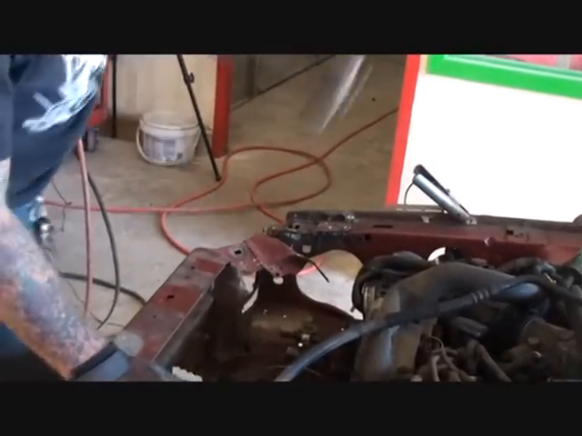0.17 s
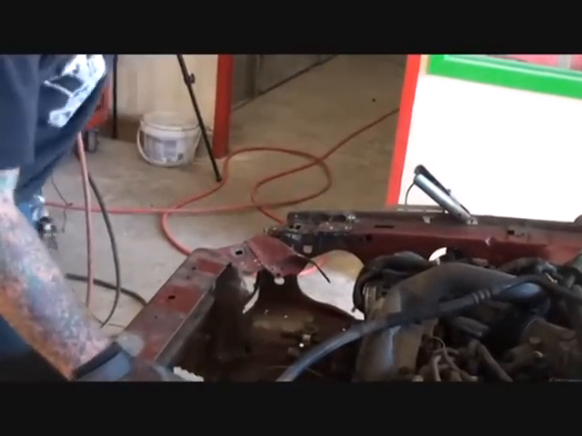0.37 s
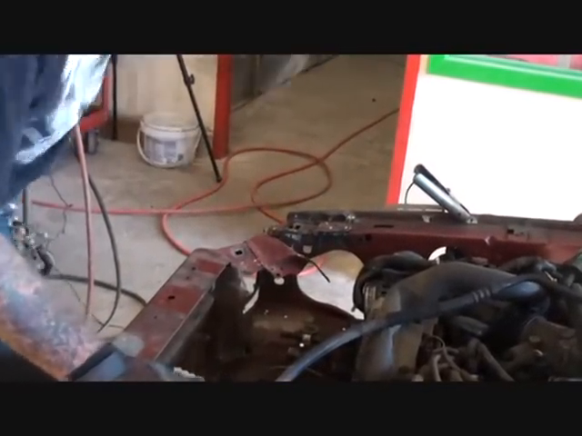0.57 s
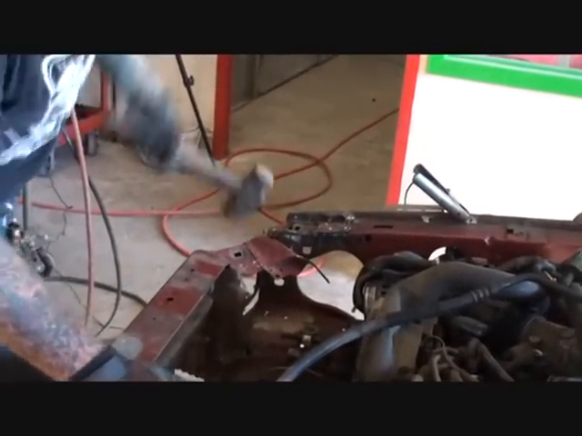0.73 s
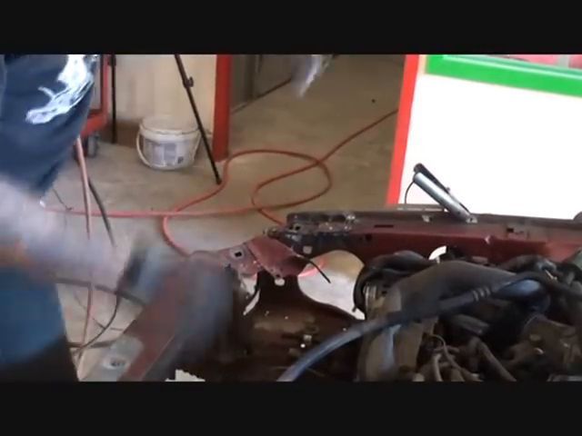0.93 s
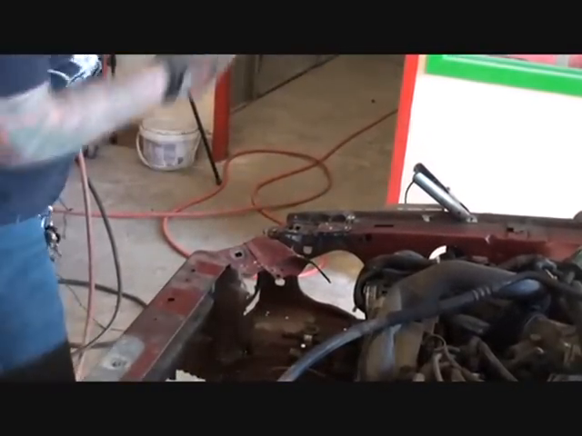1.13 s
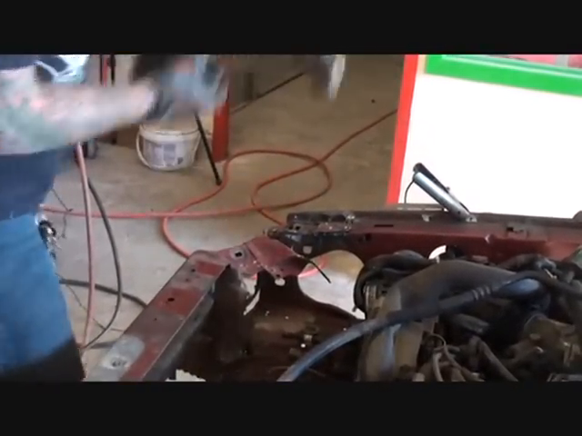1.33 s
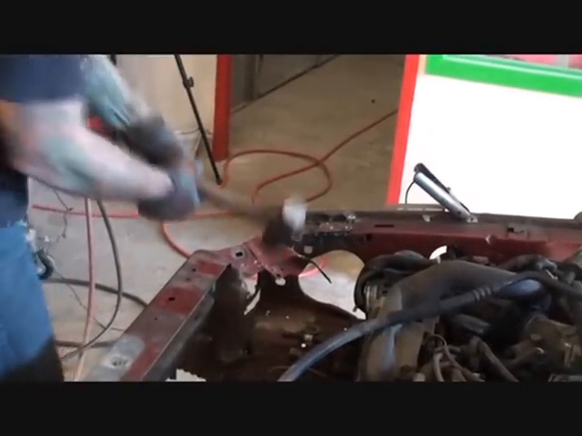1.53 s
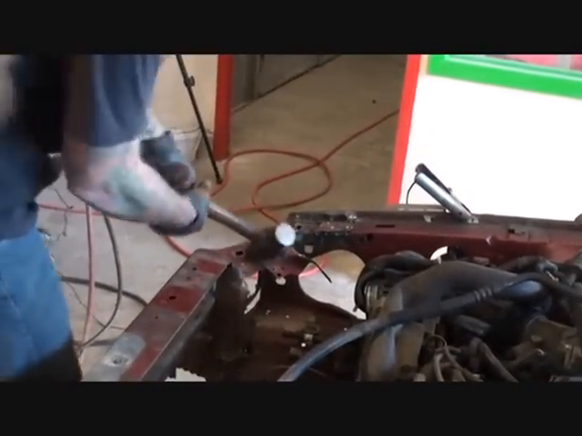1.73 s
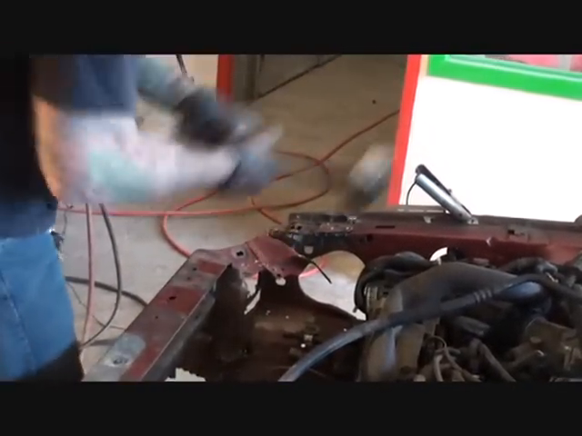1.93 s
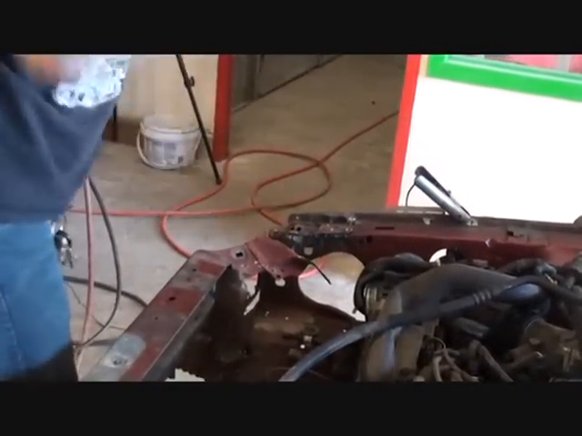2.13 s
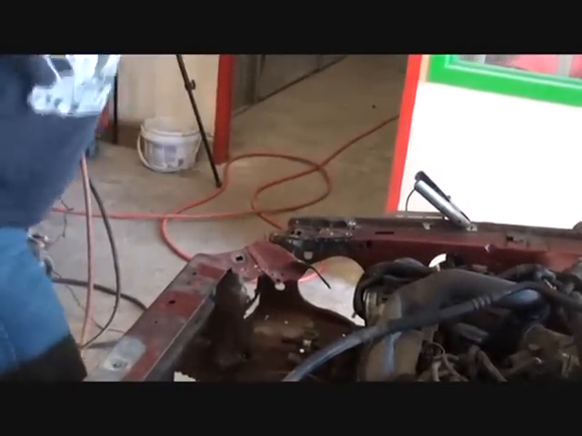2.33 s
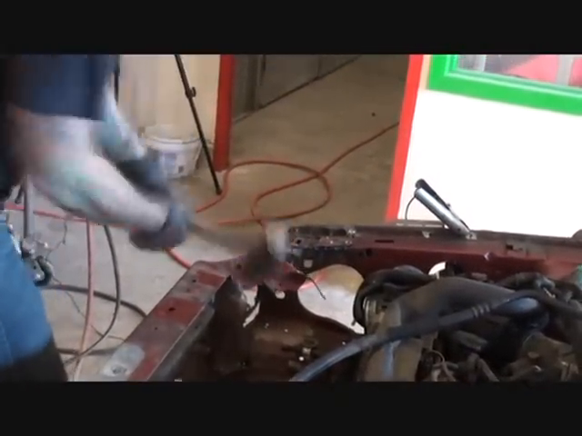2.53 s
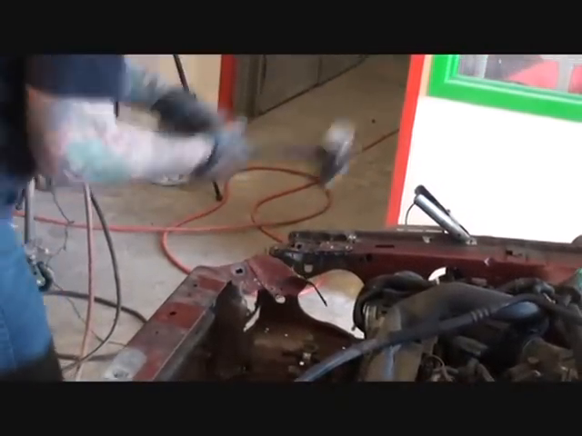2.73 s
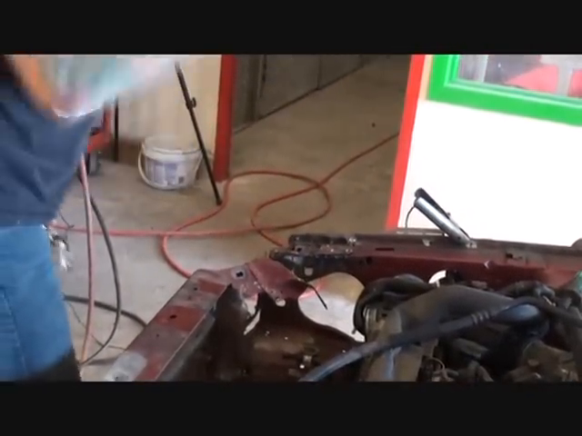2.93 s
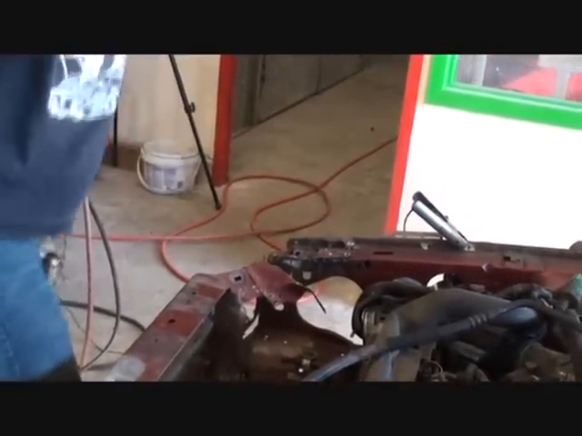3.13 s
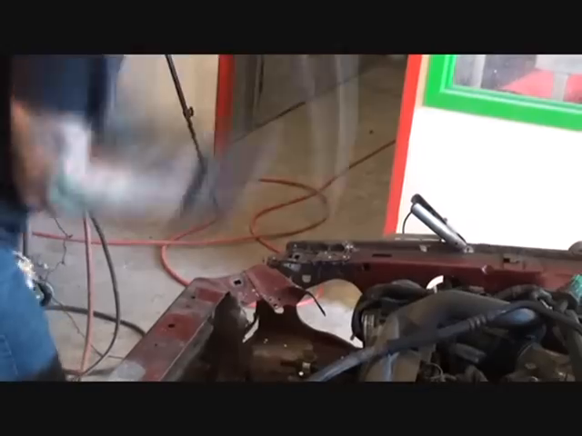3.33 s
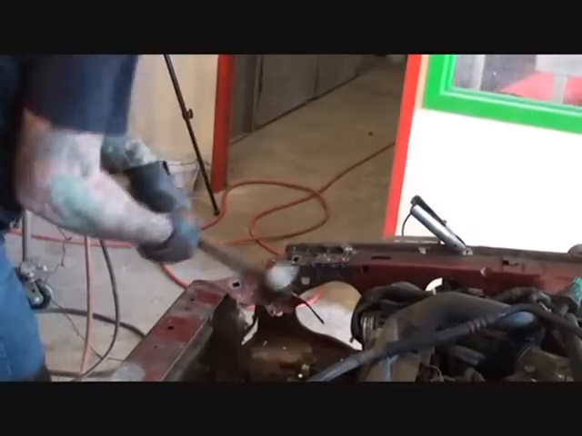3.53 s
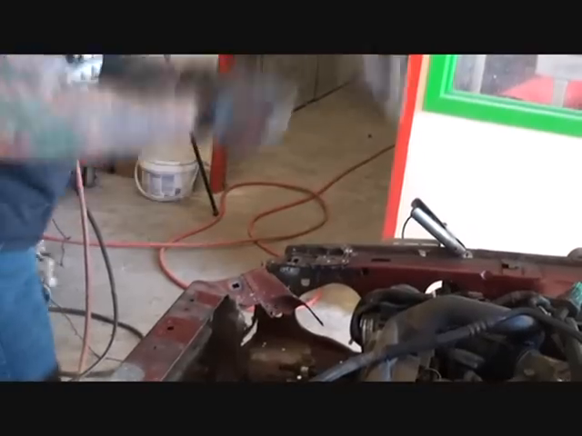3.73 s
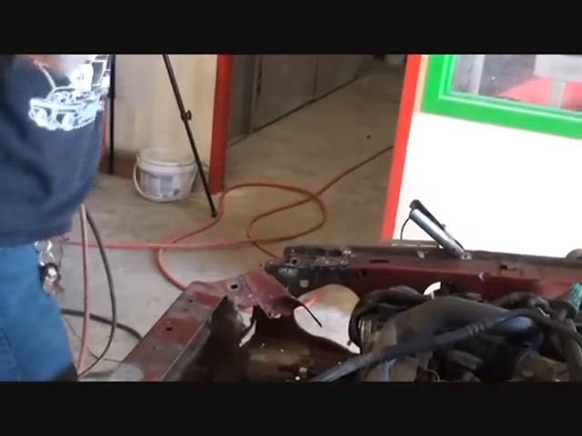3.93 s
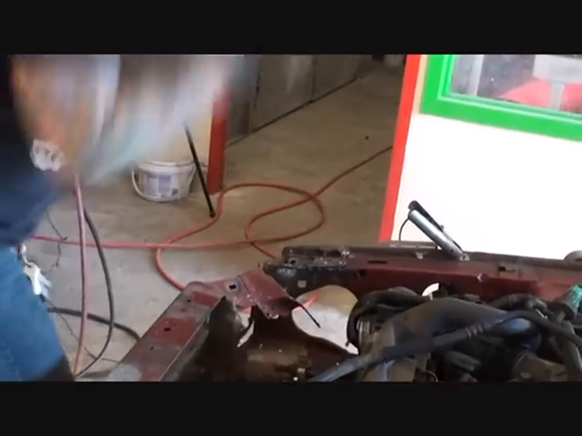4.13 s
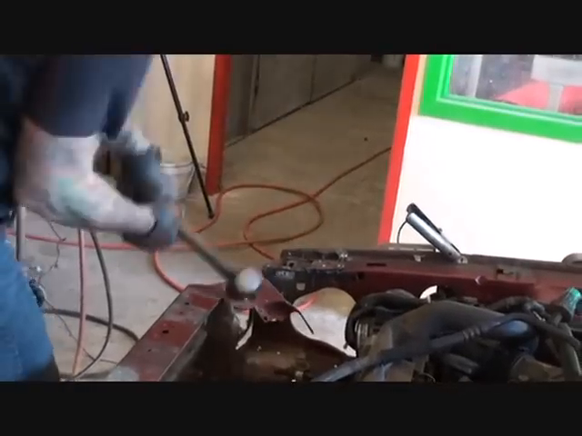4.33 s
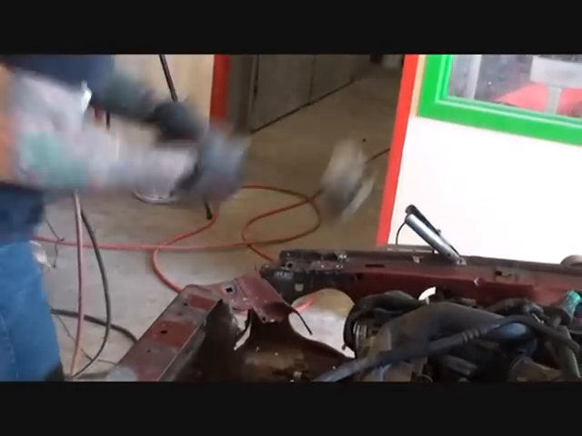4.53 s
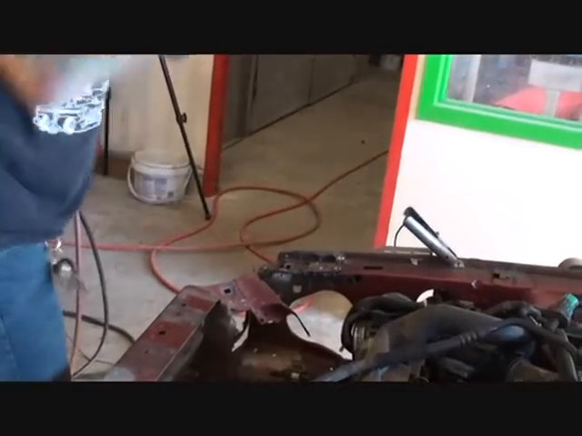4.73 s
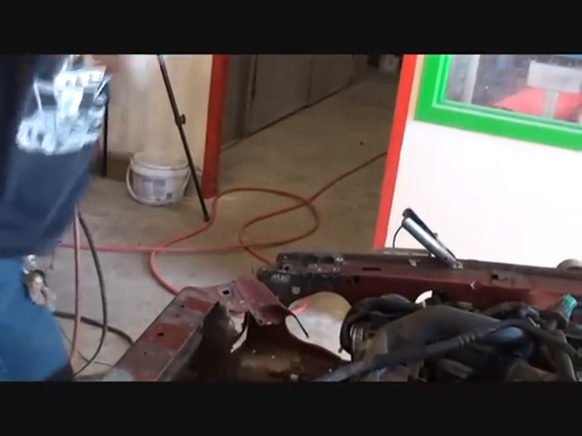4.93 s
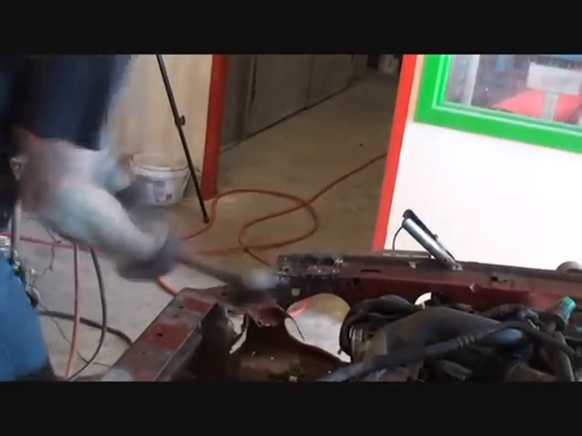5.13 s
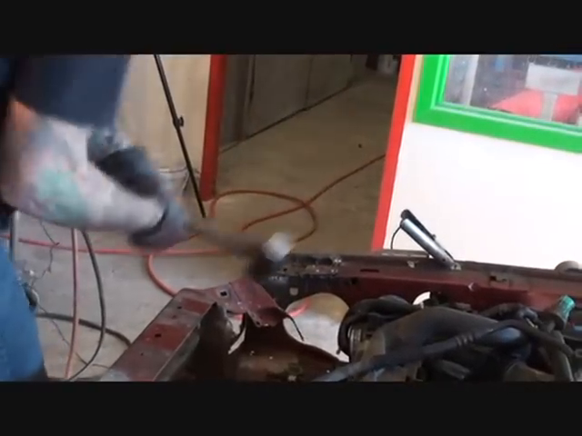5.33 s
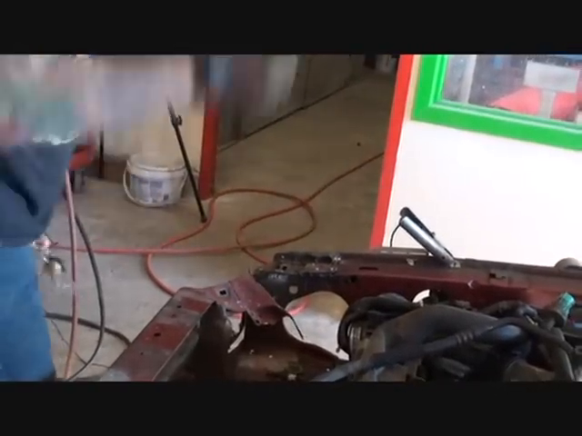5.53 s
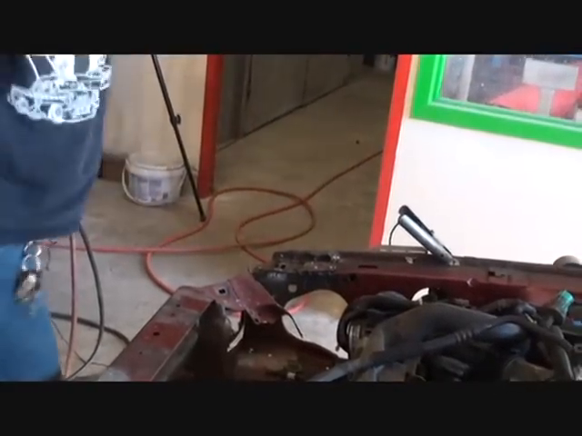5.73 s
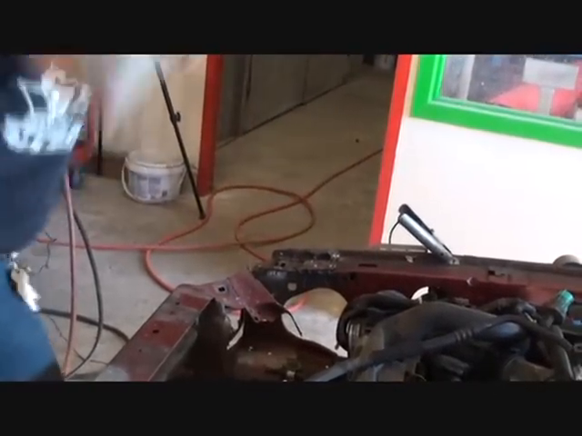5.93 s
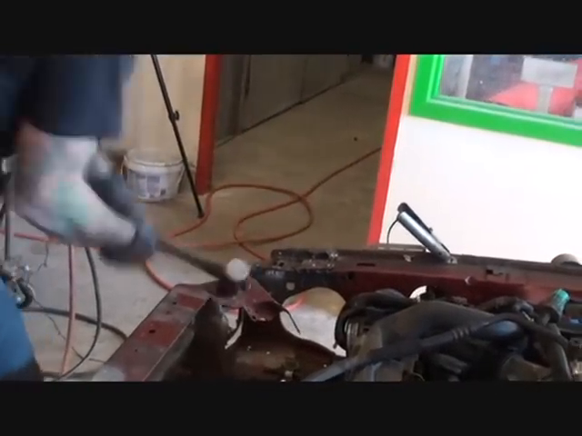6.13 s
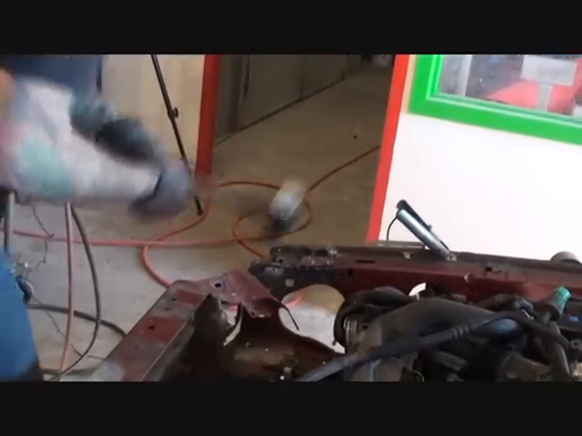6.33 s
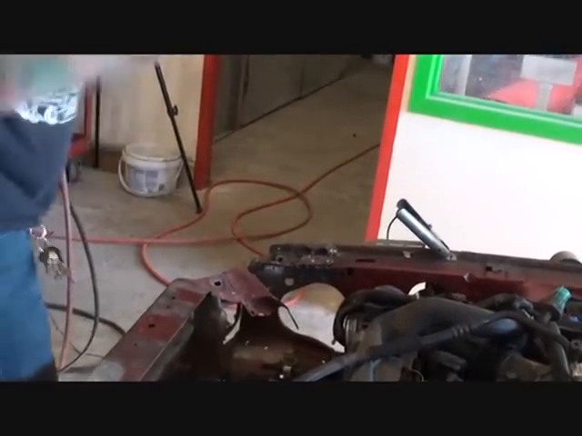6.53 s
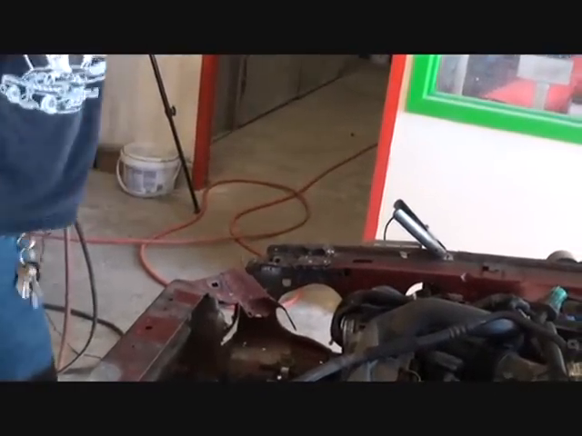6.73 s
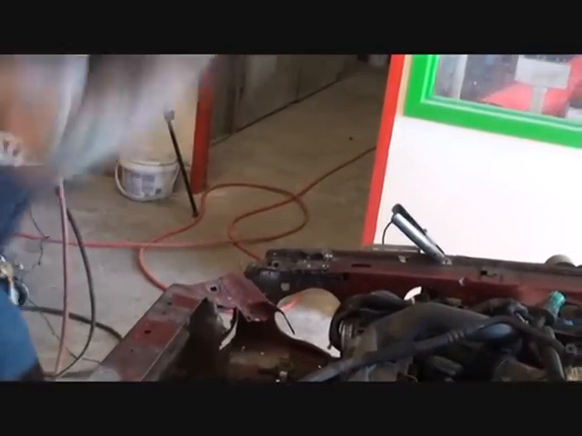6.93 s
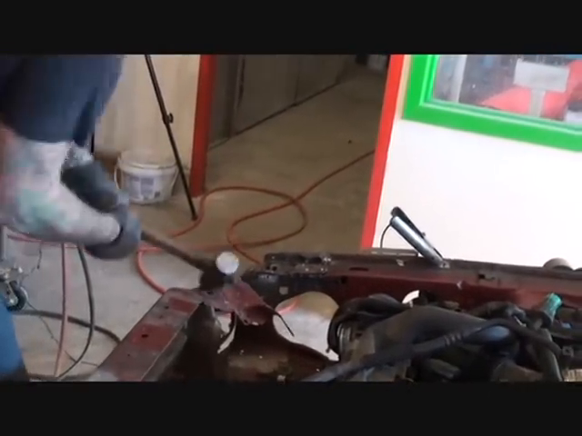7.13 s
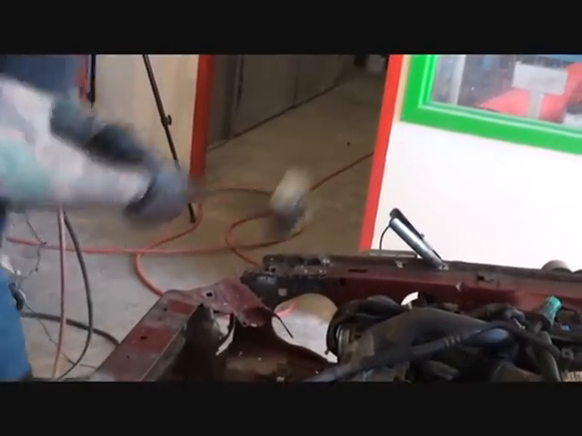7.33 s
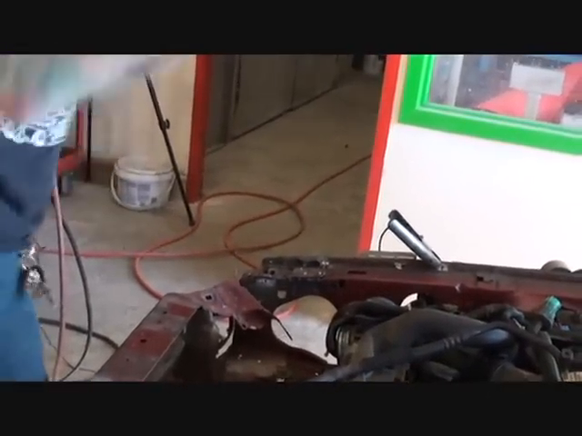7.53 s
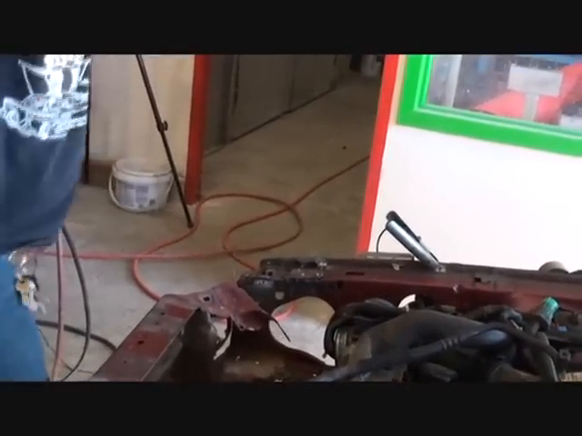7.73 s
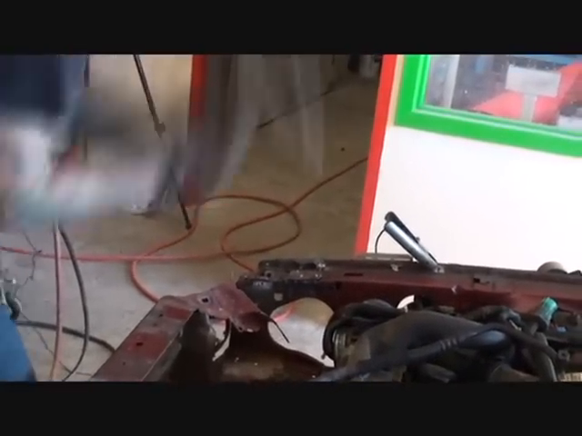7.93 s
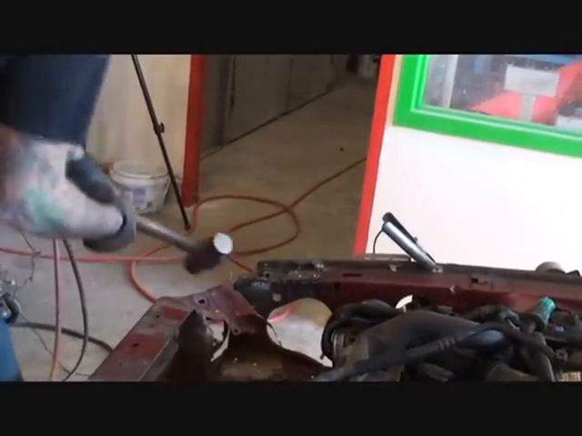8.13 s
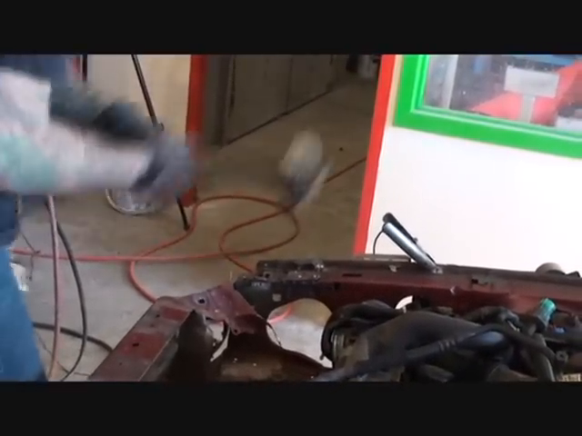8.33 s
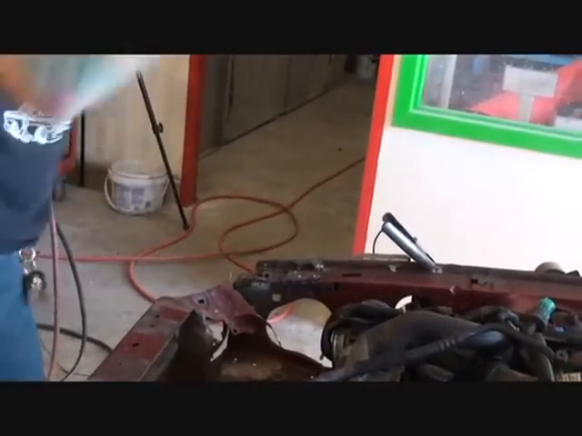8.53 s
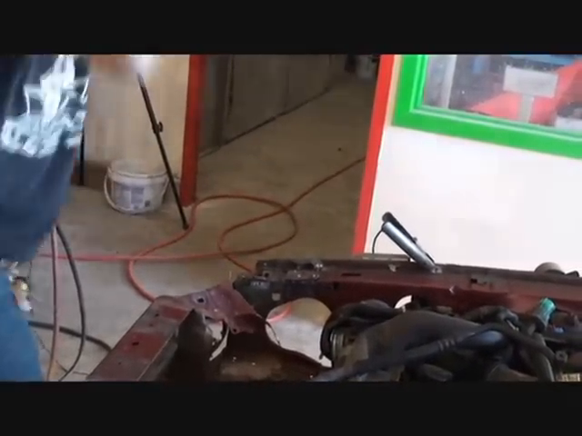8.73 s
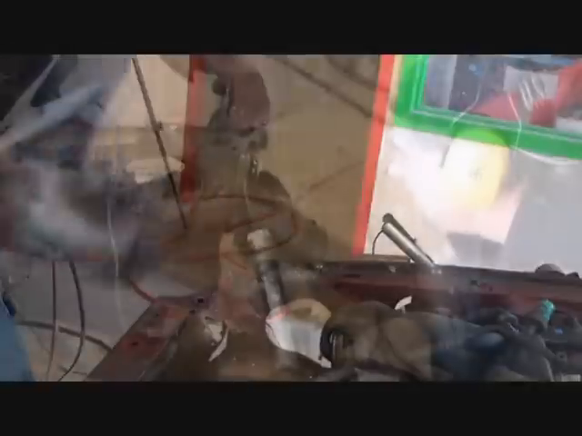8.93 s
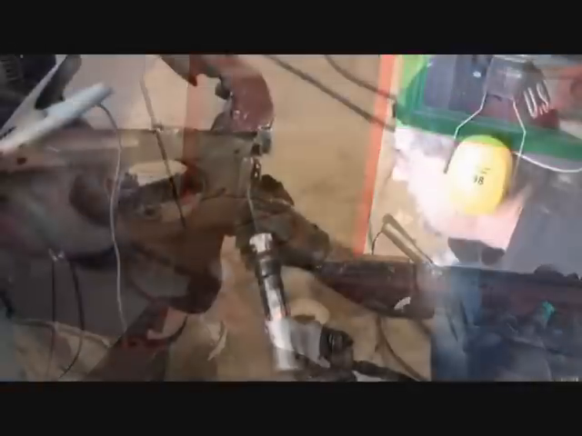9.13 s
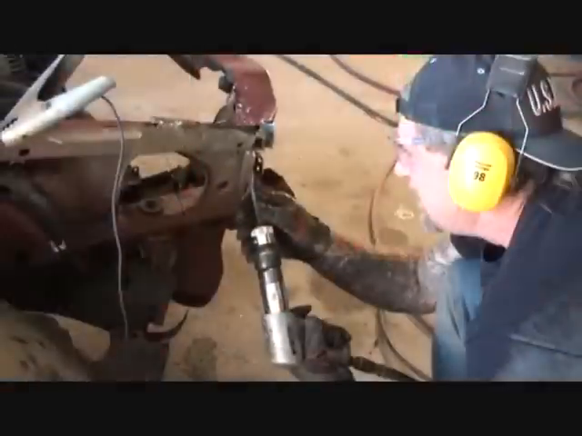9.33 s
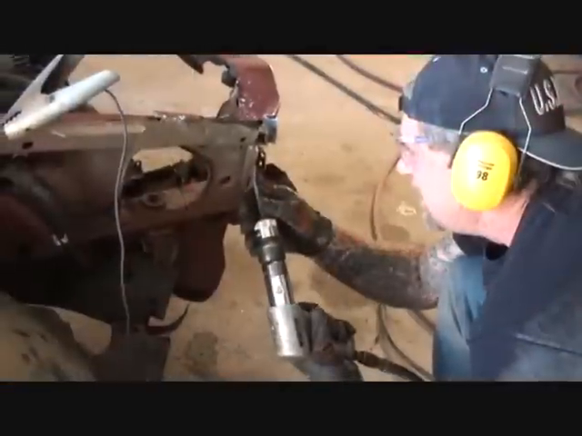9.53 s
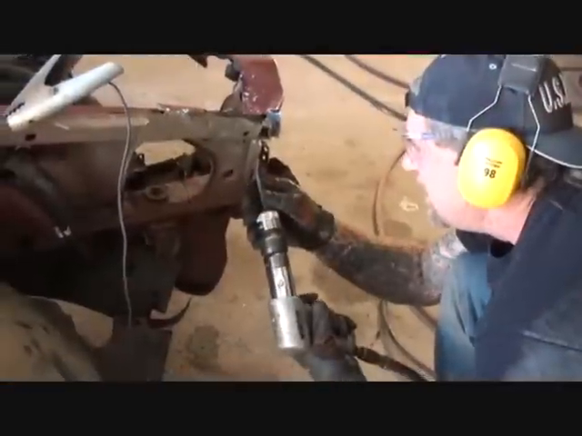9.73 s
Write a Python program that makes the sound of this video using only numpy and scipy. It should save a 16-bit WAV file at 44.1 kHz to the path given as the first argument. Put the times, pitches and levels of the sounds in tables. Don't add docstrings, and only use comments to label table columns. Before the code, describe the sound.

A reverberant workshop, heard through one overloaded camera microphone whose limiter squashes each hit. Steady air leaks hiss over a faint, wavering compressor hum. A sledgehammer hits a car's steel front frame at once, then at 0.8 seconds, just after a thin hose whistle swoops up and down. At 1.8 a glancing blow rings duller, with clearer mid-pitched tones. Full clangs follow at 2.7, 3.5, 4.4, 5.3, 6.2, 7.2 and 8.1, dense and noisy, fading within a second; the one at 7.2 is hardest, with a deep thump. Loose parts clink brightly at 3.1, tap dully around 4.8 and clink loudly at 6.55. A lower, faint whistle precedes the 5.3 blow. From 8.8 the scene crossfades: a last blow at 9.1 mixes with an air chisel's rapid rattles, about 35 to 40 strokes a second, in short bursts, a longer one at 9.5, then isolated taps, the strongest near 9.9.

```python
import sys
import numpy as np
from scipy import signal
from scipy.fft import rfft, irfft, next_fast_len
from scipy.io import wavfile
from scipy.ndimage import uniform_filter1d

SR = 44100
rng = np.random.default_rng(int(sys.argv[2]) if len(sys.argv) > 2 else 0)


def to_wav(sig):
    pcm = np.clip(np.atleast_2d(sig), -1, 1) * 32767
    pcm = np.round(pcm).astype(np.int16)
    wavfile.write(sys.argv[1], SR, pcm.T)


def ratio(d):
    e = np.asarray(d, float) / 20
    return 10 ** e


N = 436147

# (frequency [Hz], level [dB per Hz])
FRAME_COLOUR = [(24, -63), (40, -44.5), (185, -18.5), (542, -2.5), (1020, 1), (2210, -4.5), (2700, -3.5),
                (3740, -7), (5440, -8), (6170, -12.5), (6820, -12.5), (8550, -16.5), (13800, -35.5),
                (16000, -42)]
# (frequency [Hz], width [Hz], level [dB])
FRAME_PANELS = [(297, 8.5, 4.5), (577, 30, 4), (907, 51, 1.5), (1110, 23, 0.5), (1250, 20, 1.5),
                (2700, 170, 2), (3060, 310, 2.5), (6840, 150, 3)]


def evened(x):
    return x / np.sqrt(np.mean(x ** 2) + 1e-20)


def read(points, hz):
    f, value = np.transpose(points)
    return np.interp(np.log(hz + 1), np.log(f + 1), value)


def add(mix, s, sound):
    part = mix[round(s * SR):][:len(sound)]
    part += sound[:len(part)]


def coloured(x, colour, peaks, bright_db=0.):
    hz = np.fft.rfftfreq(len(x), 1 / SR)
    bumps_db = sum(db / (1 + (2 * (hz - f) / width) ** 2) for f, width, db in peaks)
    tilt_db = bright_db * np.log2(hz / 2000 + 0.094)
    shape = ratio(read(colour, hz) + bumps_db + tilt_db)
    return irfft(rfft(x) * evened(shape), len(x))


def fuzzy(hz, width):
    keep = np.exp(-np.pi * width / SR)
    noise = rng.standard_normal((2, len(hz)))
    for _ in range(2):
        noise = signal.lfilter([1], [1, -keep], noise)
    a, b = noise
    carrier = np.exp(2j * np.pi * np.cumsum(hz) / SR)
    return evened(((a + 1j * b) * carrier).real)


def leak_hiss():
    # (frequency [Hz], level [dB per Hz])
    leak_colour = [(35, -41), (60, -26), (150, -23), (380, -17), (700, -11.5), (1400, -16.5), (2600, -13),
                   (4000, -17), (6500, -17.5), (8000, -19), (10000, -15.5), (11500, -22.5), (13000, -29.5),
                   (16000, -35)]
    # (frequency [Hz], width [Hz], level [dB])
    leak_pipes = [(2580, 210, 0), (4300, 260, 4), (7040, 310, 2.5), (9300, 370, 0), (10200, 760, -0.5),
                  (14900, 900, 8)]
    # (time [s], level [dB])
    leak_drift = [
        (0, 2),
        (1.7, .2),
        (2.2, 1.7),
        (5.1, 2),
        (6, 0.5),
        (8.7, -0.1),
    ]
    t = np.arange(N) / SR
    flutter = evened(uniform_filter1d(uniform_filter1d(rng.standard_normal(N), 3000), 3000))
    hiss_drift_db = np.interp(t, *np.transpose(leak_drift))
    hiss = coloured(rng.standard_normal(next_fast_len(N, True)), leak_colour, leak_pipes)[:N]
    return ratio(-41 + hiss_drift_db + .5 * flutter) * hiss


def compressor_hum():
    # (frequency [Hz], level [dB rms])
    hum_tones = [(484.5, -54), (820, -64), (1130, -55), (1293, -66), (1454, -61), (2588, -63),
                 (2722, -59.5), (4528, -61)]
    drift_db = -.5 * (np.arange(N) / SR - 3.5)
    out = np.zeros(N)
    for hz, db in hum_tones:
        waver = evened(uniform_filter1d(rng.standard_normal(N), 9000))
        phase = 2 * np.pi * np.cumsum(hz * (1 + .001 * waver)) / SR
        out += np.sqrt(2) * ratio(db + drift_db + 3.0 * waver) * np.sin(phase)
    return out


def clang(colour, peaks, bright_db, longer, crack_db, crack_t60, crack_bright_db, size=40960):
    # (frequency [Hz], t60 [s])
    hall_decay = [(100, 0.91), (300, 0.59), (700, 0.76), (1500, 0.9), (3000, 0.9), (4200, 0.88),
                  (6000, 0.71), (9000, 0.6), (14000, 0.56)]
    hz = np.fft.rfftfreq(256, 1 / SR)[:, None]
    t = np.arange(size // 64 + 1) * 64 / SR
    a, b = rng.standard_normal((2, len(t), len(hz))).transpose(0, 2, 1)
    swell = 1 - 0.44 * np.exp(-t * (hz + 100) / 14)
    t60 = longer * read(hall_decay, hz) * rng.uniform(0.98, 1.04, hz.shape)
    field = swell * ratio(-60 * t / t60)
    tail = signal.istft((a + 1j * b) * field, nperseg=256, noverlap=192)[1][:size] / 13

    t = np.arange(size) / SR
    crack = ratio(crack_db - 60 * np.maximum(t - .008, 0) / crack_t60) * rng.standard_normal(size)
    lumps = rng.uniform([300, 15, -3], [8000, 50, 3.5], (16, 3))
    both = coloured(tail, colour, [*peaks, *lumps], bright_db)
    both += coloured(crack, colour, [], bright_db + crack_bright_db)
    fade_in = np.minimum(t / 0.0046, 1) ** 2.6
    fade_out = signal.windows.tukey(2 * size, .2)[size:]
    return both * fade_in * fade_out


def thump(db):
    t = np.arange(2000) / SR
    return ratio(db + 7.5 - 60 * t / 0.023) * np.sin(2 * np.pi * 110 * t)


def sledge_blows():
    # (time [s], force [dB], ring length [factor], thump level [dB])
    hammer_blows = [
        (0.0144, 20, 0.78, -29),
        (.775, 22, 0.77, -25),
        (2.662, 20.5, 0.86, -23),
        (3.505, 21.5, 0.77, -37),
        (4.368, 18.5, 0.86, -32),
        (5.265, 21.5, 0.84, -23),
        (6.215, 22.5, 0.81, -25),
        (7.17, 23, .8, -13),
        (8.127, 19.5, .83, -31),
        (9.086, 18, 1, -21),
    ]
    out = np.zeros(N)
    for s, db, longer, thump_db in hammer_blows:
        blow = clang(FRAME_COLOUR, FRAME_PANELS, 1.27, longer, crack_db=-8.5, crack_t60=0.054, crack_bright_db=4.0)
        add(out, s - .003, ratio(db - 9.5) * blow)
        add(out, s, thump(thump_db))
    return out


def whistle(start, top_s, top_hz, db):
    bend_per_s2, rise_s, after_s = 7.6, .04, .11
    t = np.arange(start, top_s + after_s, 1 / SR)
    hz = top_hz * (1 - bend_per_s2 * (t - top_s) ** 2)
    fade = np.clip(np.minimum(t - t[0], 4 * (t[-1] - t)) / rise_s, 0, 1)
    return ratio(db) * fade * fuzzy(hz, 145.)


def hose_whistles():
    # (start [s], time of top pitch [s], top pitch [Hz], level [dB rms])
    hose_swoops = [
        (.525, .68, 5190, -48.5),
        (.53, .66, 5850, -55),
        (5.13, 5.24, 4690, -51),
    ]
    out = np.zeros(N)
    for start, top_s, top_hz, db in hose_swoops:
        add(out, start, whistle(start, top_s, top_hz, db))
    return out


def single_mode(hz, db, t60):
    t = np.arange(30000) / SR
    tone = 0.98 * np.sin(2 * np.pi * (hz * t + rng.random())) + 1.1 * fuzzy(hz + 0 * t, 70.0)
    return ratio(db - 60 * t / t60) * tone * np.minimum(t / 0.021, 1)


def glancing_blow():
    # (time [s], peak level [dB])
    glance_hit = [
        (1.77, -3.5),
    ]
    # (frequency [Hz], level [dB], t60 [s])
    member_modes = [(448, -13.5, 0.42), (835, -2, 0.24), (988, -5, 0.33), (1036, -5.5, 0.49),
                    (1085, -8, 0.42), (1230, -14, 0.5), (1570, -19, 0.5), (1830, -21, 0.45),
                    (1920, -16, 0.28), (2160, -10, 0.44), (2850, -11, 0.49), (4118, -18, 0.65),
                    (4440, -25, 0.66)]
    # (frequency [Hz], level [dB per Hz])
    member_colour = [(35, -77), (60, -45), (371, -20.5), (437, -19), (698, -9.5), (1010, -7), (1410, -14.5),
                     (4120, -17), (11500, -35.5), (16000, -54)]
    out = np.zeros(N)
    s, db = glance_hit[0]
    blow = clang(member_colour, [], 0.086, 0.78, crack_db=-8, crack_t60=0.035, crack_bright_db=2.0)
    add(out, s - .005, ratio(db - 6.0) * blow)
    for hz, mode_db, t60 in member_modes:
        add(out, s - .003, single_mode(hz, db + mode_db - 9.5, t60))
    return out


def falling_parts():
    # (time [s], peak level [dB], brightness [dB per octave], ringing pitch [Hz], ringing level [dB])
    part_drops = [
        (3.059, -20.5, 3, 4530, -37),
        (4.722, -40, -2, 1520, -37.5),
        (4.86, -30, -1.5, 1290, -46),
        (6.544, -15.5, 2.5, 3200, -46),
        (6.577, -30, 0, 4450, -43),
    ]
    out = np.zeros(N)
    for s, db, bright_db, hz, ring_db in part_drops:
        longer = 0.95 - 0.23 * bright_db
        clink = clang(FRAME_COLOUR, FRAME_PANELS, bright_db, longer,
                      crack_db=-2.0, crack_t60=0.056, crack_bright_db=2.5, size=16384)
        add(out, s, ratio(db - 4.0) * clink)
        add(out, s, single_mode(hz, ring_db, longer + 0.14))
    return out


def air_chisel():
    # (first stroke [s], held [s], rate [strokes per s], strength [dB])
    trigger_bursts = [
        (8.837, .01, 39, 1),
        (8.854, .108, 32, 7),
        (9.088, .01, 39, 3),
        (9.108, .167, 39, 8),
        (9.297, .01, 39, 8),
        (9.4964, .224, 38, 7.5),
        (9.775, .01, 39, -9),
        (9.848, .01, 39, -3.5),
        (9.868, .01, 39, 9),
    ]
    # (frequency [Hz], level [dB per Hz])
    chisel_colour = [(24, -57), (40, -44), (185, -28), (269, -16), (392, -9), (455, -12), (585, -4.5),
                     (965, -7), (1070, -1.5), (1440, -5.5), (1550, -6.5), (5440, -6.5), (16000, -23)]
    # (frequency [Hz], width [Hz], level [dB])
    chisel_panels = [(290, 30, 2.9), (1280, 78, 3.7), (1520, 40, 2.5), (2160, 66, 4.9), (2660, 210, 5.2),
                     (3170, 120, 4.4), (4300, 72, 2.1), (5700, 130, 1.3)]
    soft_start_db, sag_db_per_s = -4, 35
    scatter_db, scatter_bright_db, jitter_s = 1.5, 1.2, .001
    out = np.zeros(N)
    for first, held, rate, db in trigger_bursts:
        since = np.arange(0, held, 1 / rate)
        force_db = db - sag_db_per_s * since + soft_start_db * (since == 0)
        for s, stroke_db in zip(first + since, force_db):
            a, b, c = rng.standard_normal(size=3)
            stroke = clang(chisel_colour, chisel_panels, scatter_bright_db * a - 0.94, 0.88,
                           crack_db=-4, crack_t60=.055, crack_bright_db=4.5, size=16384)
            add(out, s - .002 + jitter_s * b, ratio(stroke_db + scatter_db * c - 7.5) * stroke)
    return out


def limited(x, ceiling_db=-9.5, firm=0.96, knee_db=1.7, recover_db=135.0, sag=0.23, sag_s=4.3):
    power_db = 10 * np.log10(abs(uniform_filter1d(x ** 2, 500)) + 1e-12)
    fall = np.arange(N) * recover_db / SR
    held_db = np.maximum.accumulate(power_db + fall) - fall
    over_db = firm * knee_db * np.logaddexp(0, (held_db - ceiling_db) / knee_db)
    keep = np.exp(-1 / (sag_s * SR))
    slow_db = sag * signal.lfilter([1 - keep], [1, -keep], over_db)
    x = x / ratio(uniform_filter1d(over_db, 200) + slow_db)
    return x / (1 + abs(x / 1.1) ** 8) ** (1 / 8)


def scene():
    dissolve_s, dissolve_length_s = 8.823, 0.73
    share = np.clip((np.arange(N) / SR - dissolve_s) / dissolve_length_s, 0, 1)
    air = leak_hiss() + compressor_hum() + hose_whistles()
    hammering = sledge_blows() + glancing_blow() + falling_parts()
    mix = (1 - share) * limited(hammering + air) + share * limited(air_chisel() + air[::-1])
    return np.array([mix, mix])


def roll_off(x):
    return signal.sosfilt(signal.butter(12, 16470, fs=SR, output="sos"), x)


def record(dry):
    edge_hz, swap_share, swap_from_hz = 15760, .01, 4200
    hz, t, z = signal.stft(dry[0], SR, nperseg=1024)
    hz = hz[:, None]
    power = uniform_filter1d(abs(z) ** 2, 3, 1)
    band_db = 10 * np.log10(abs(uniform_filter1d(power, 9, 0)) / power.sum(0) + 1e-15)
    wander_db = 2 * np.repeat(rng.standard_normal((65, len(t))), 8, 0)[:513]
    needed_db = -57.5 + 7 * (hz - 15000) / 1000 + wander_db
    kept = z * (hz < edge_hz) * ((band_db > needed_db) | (hz < 13800))
    mono = signal.istft(kept, SR, nperseg=1024)[1][:N]

    cells = rng.random((len(t) // 3 + 1, 17)).T < swap_share * (np.arange(17) < 10)[:, None]
    swapped = np.repeat(np.repeat(cells, 32, 0), 3, 1)[:513, :len(t)]
    other = np.exp(2j * np.pi * rng.random((len(t), 513)).T) * swapped * (hz > swap_from_hz)
    side = signal.istft(kept * other, SR, nperseg=1024)[1][:N]
    return roll_off(np.clip([mono + side, mono - side], -1, 1))


dry = scene()
out = record(dry)
to_wav(out)
```